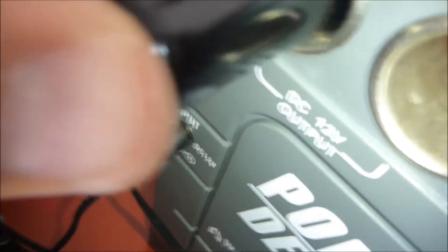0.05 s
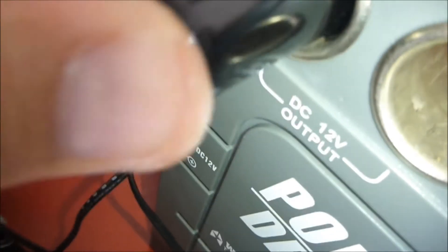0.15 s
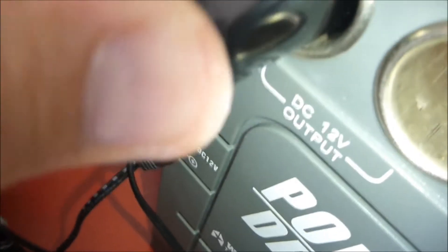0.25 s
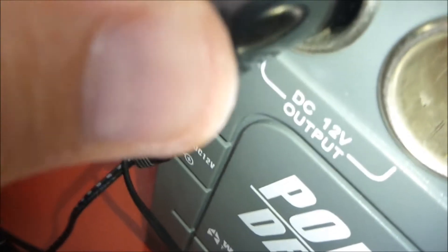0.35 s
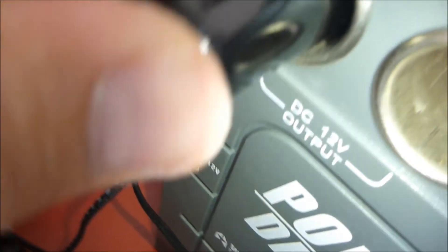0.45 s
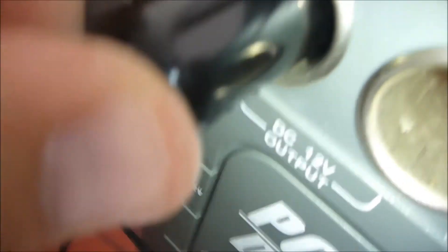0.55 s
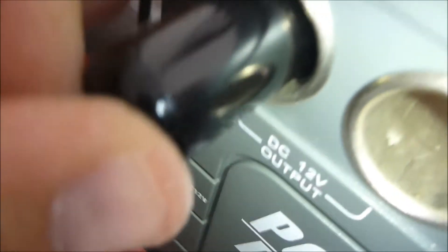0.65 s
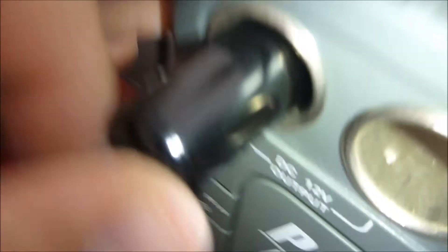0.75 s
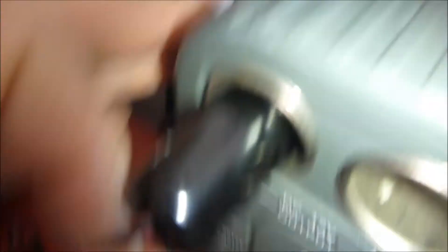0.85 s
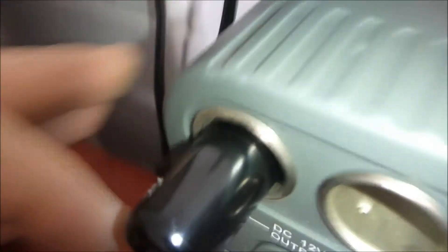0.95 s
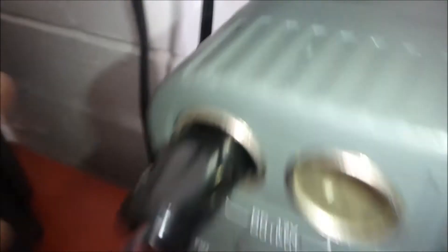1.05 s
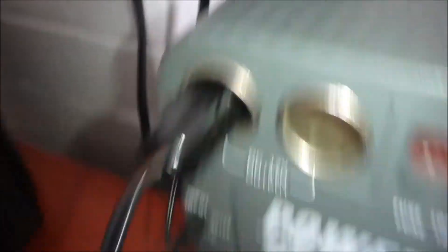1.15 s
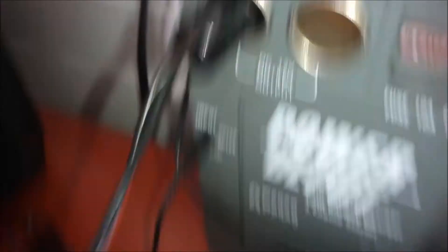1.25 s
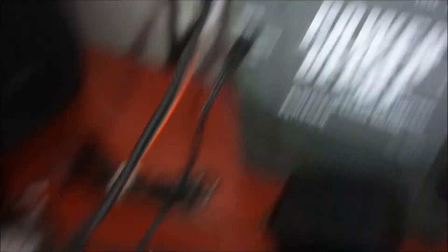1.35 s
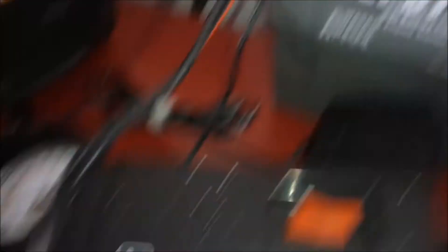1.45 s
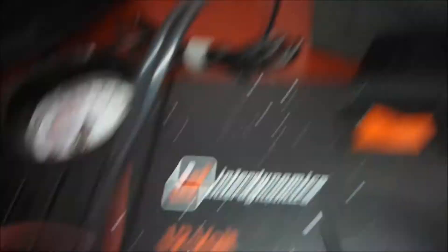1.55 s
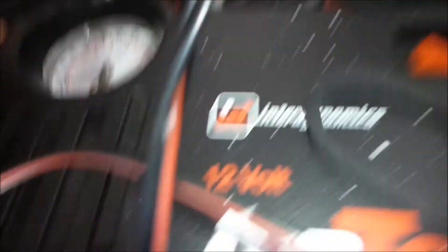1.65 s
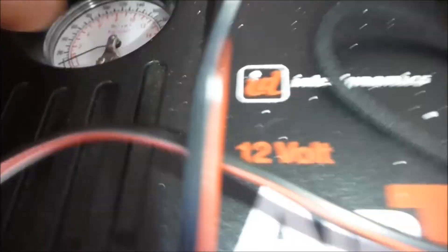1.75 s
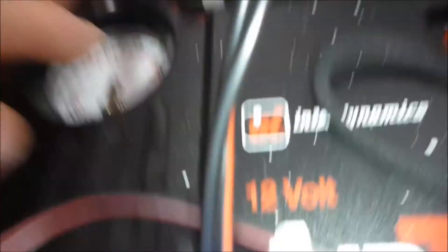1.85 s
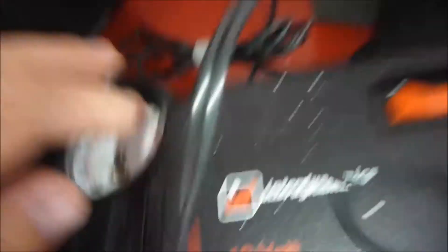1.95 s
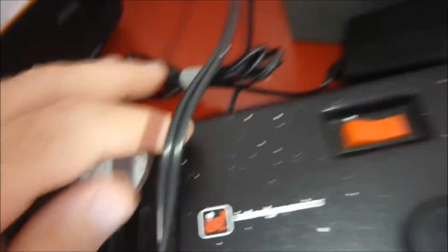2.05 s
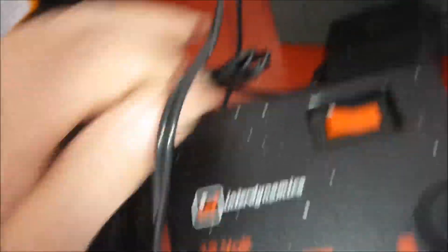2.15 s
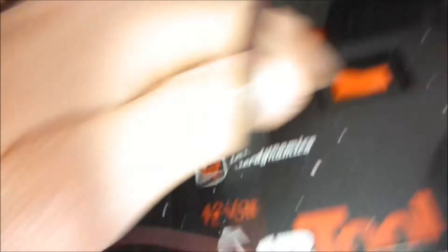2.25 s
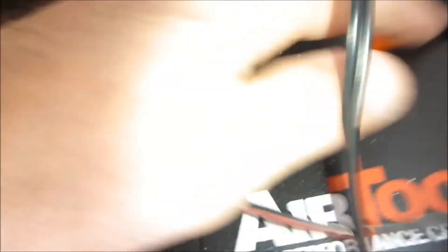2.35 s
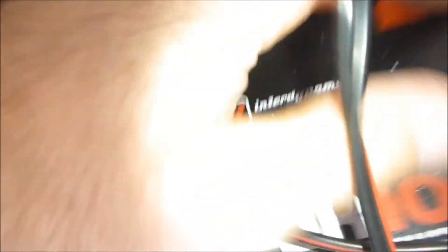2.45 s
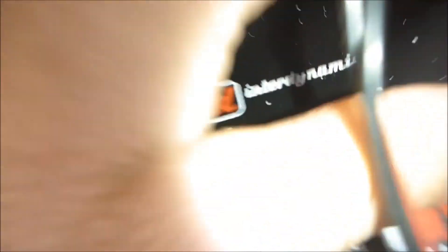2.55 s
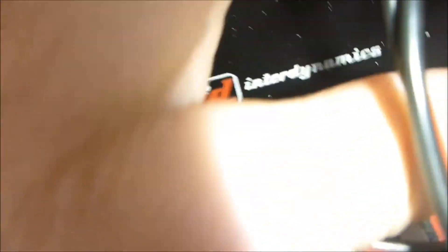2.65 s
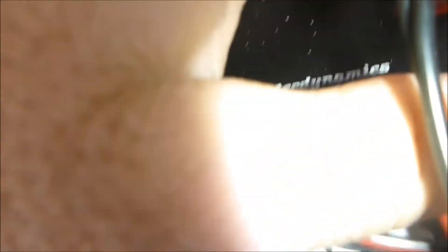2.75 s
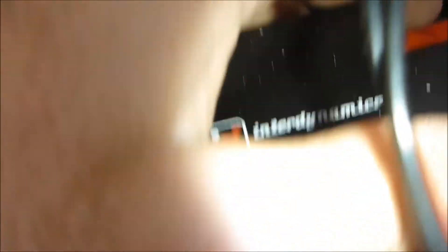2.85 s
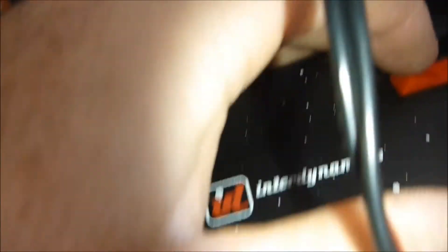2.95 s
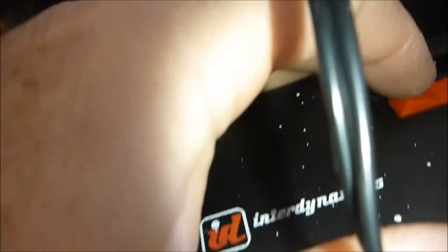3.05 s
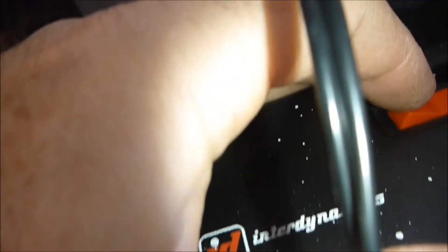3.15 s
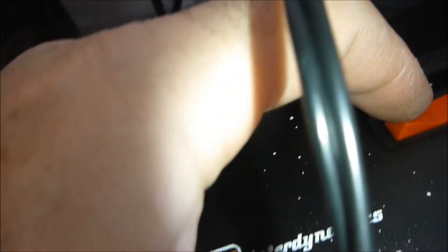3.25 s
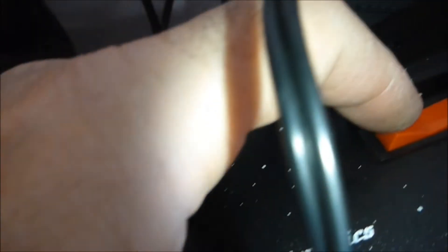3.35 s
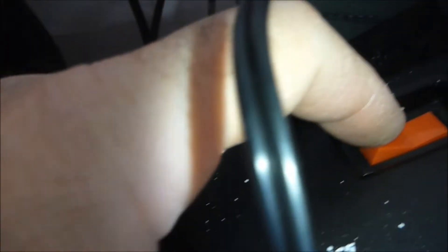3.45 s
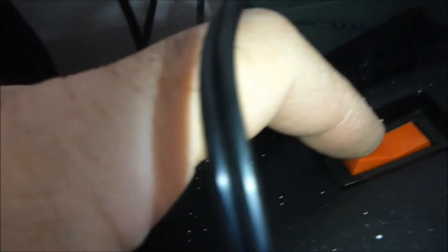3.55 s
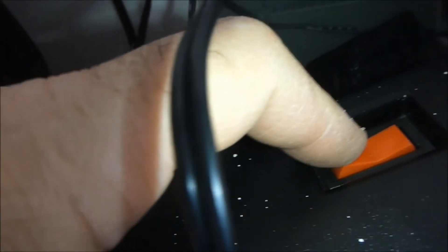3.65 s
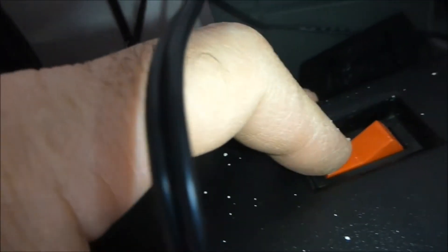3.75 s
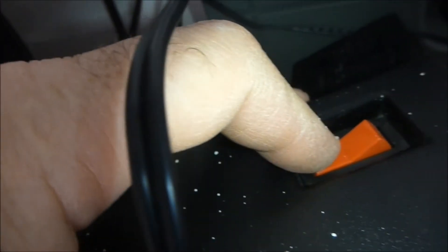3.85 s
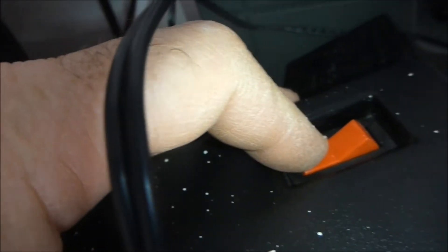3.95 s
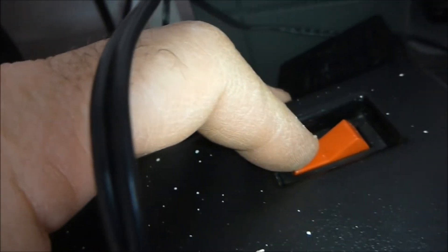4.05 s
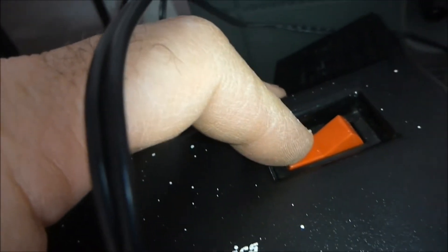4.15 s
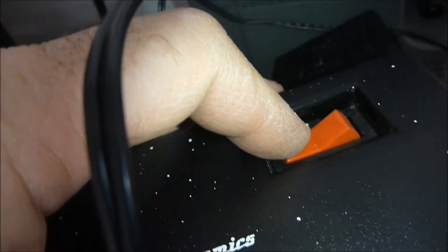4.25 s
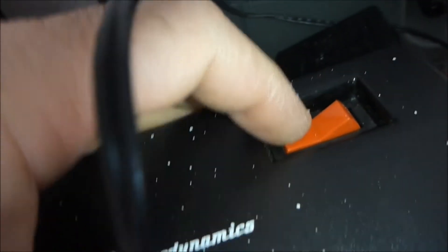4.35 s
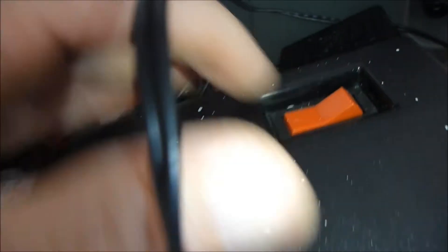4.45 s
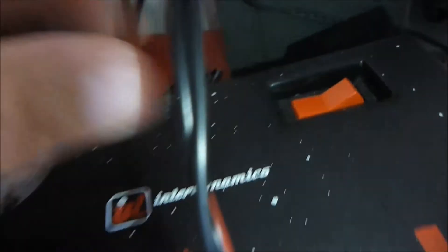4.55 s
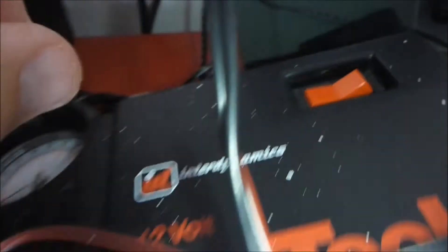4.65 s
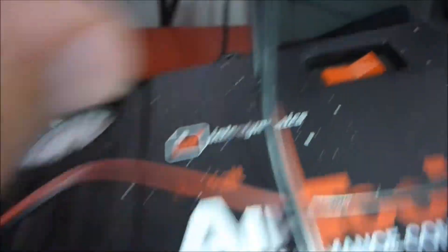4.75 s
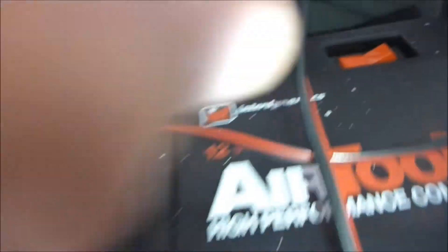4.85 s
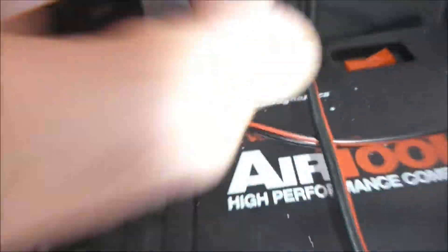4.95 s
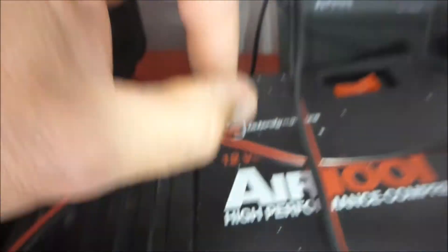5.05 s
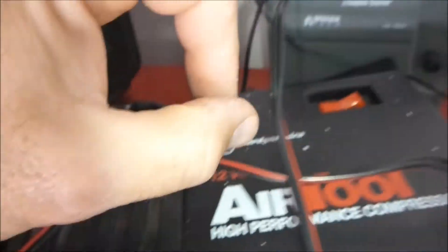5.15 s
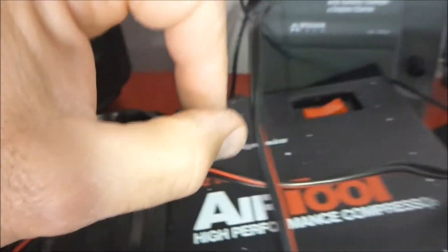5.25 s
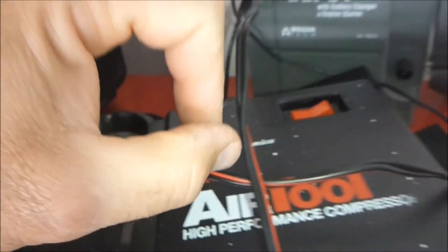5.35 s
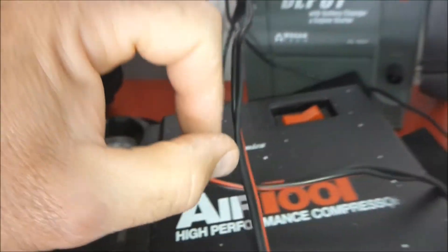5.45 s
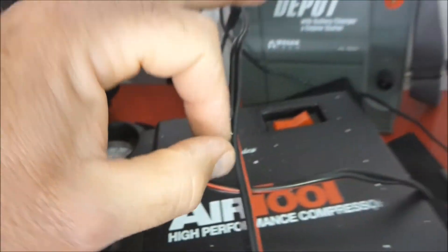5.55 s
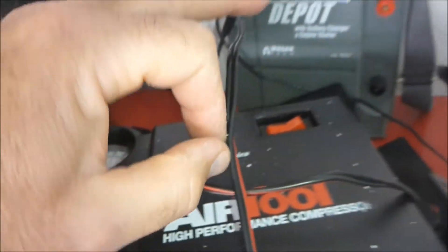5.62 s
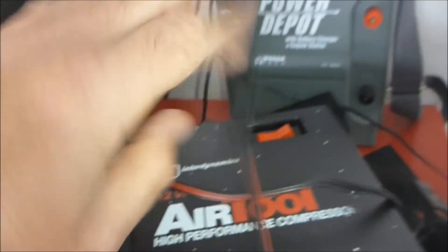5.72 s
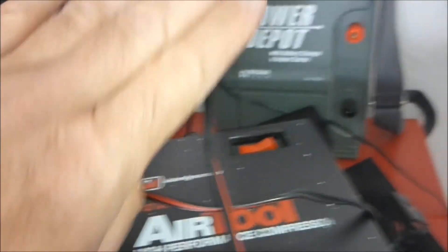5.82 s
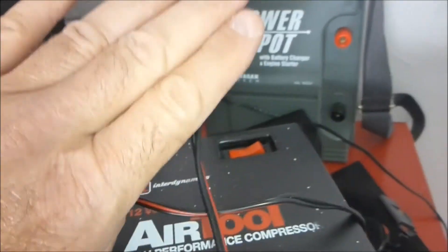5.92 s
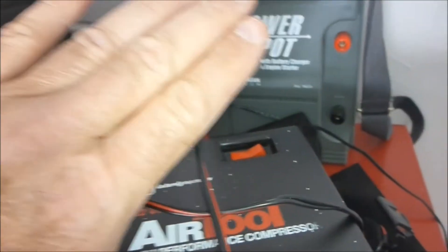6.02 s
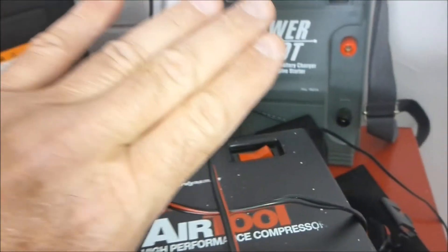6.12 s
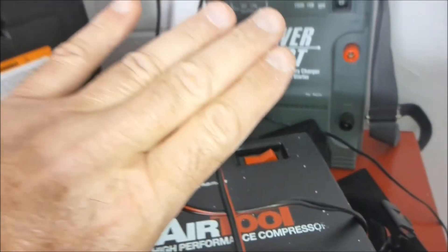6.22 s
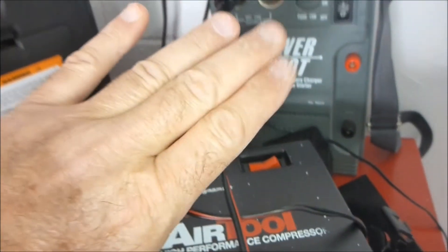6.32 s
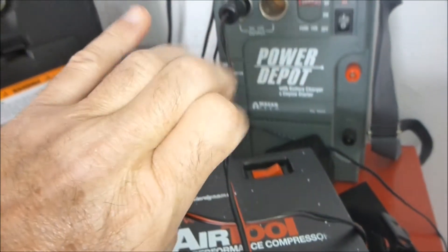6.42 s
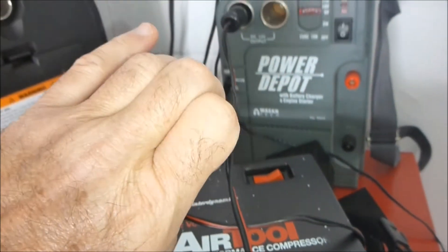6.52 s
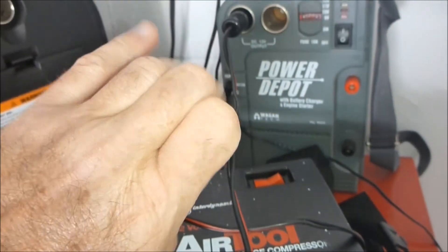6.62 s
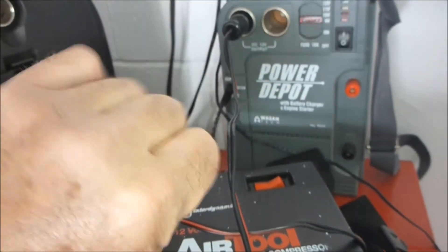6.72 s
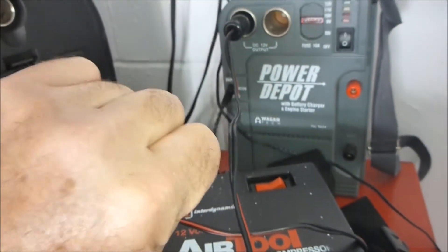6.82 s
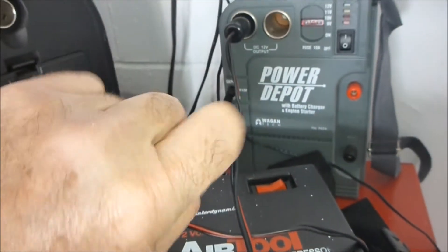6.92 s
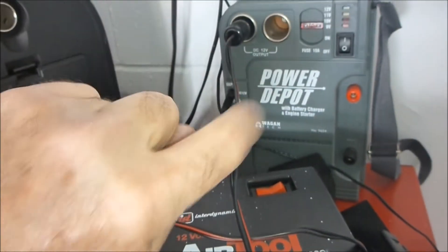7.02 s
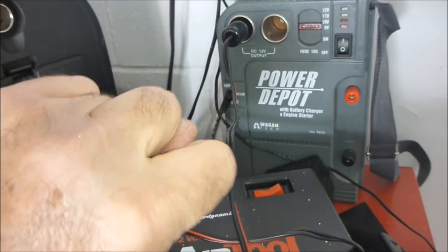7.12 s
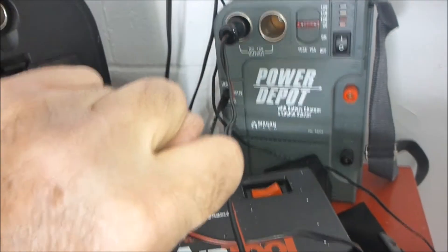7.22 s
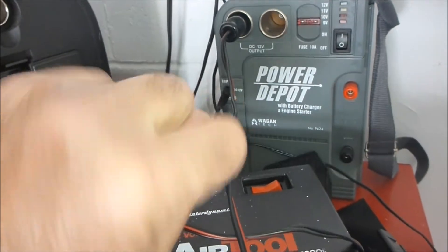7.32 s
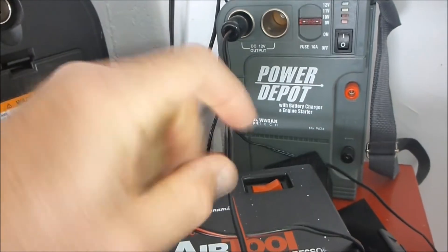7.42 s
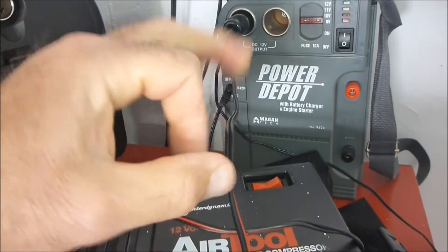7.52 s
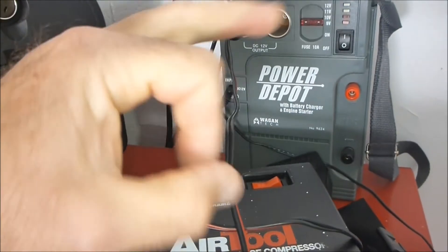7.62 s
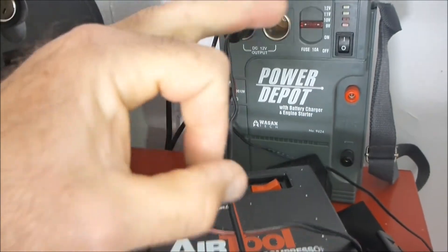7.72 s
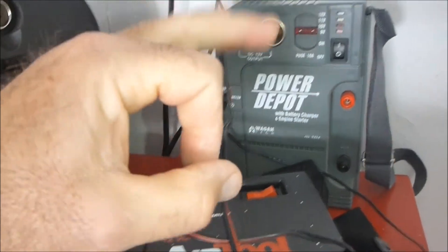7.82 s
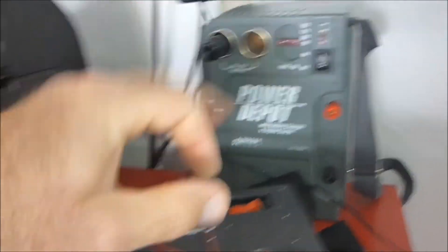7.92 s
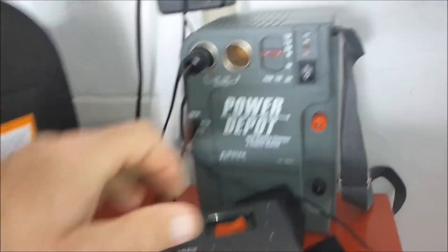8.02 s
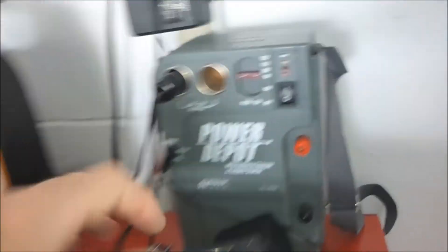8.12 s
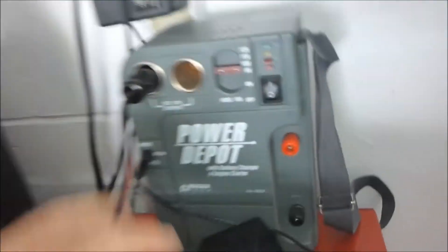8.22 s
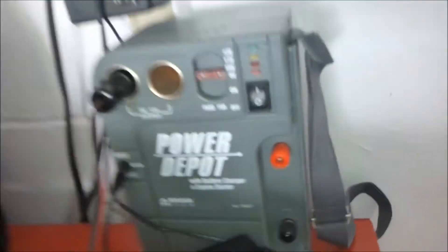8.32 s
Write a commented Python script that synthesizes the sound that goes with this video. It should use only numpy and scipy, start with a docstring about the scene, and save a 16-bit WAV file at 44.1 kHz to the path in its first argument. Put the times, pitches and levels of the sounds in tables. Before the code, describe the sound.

The scene is outdoors, with the microphone close and a dull, steady noise in the distance. In the first 0.2 seconds a plug scrapes and clicks into a battery pack, followed by light ticks and a faint squeak. A far-off bird chirps softly from about 0.3 to 3.5 seconds. Around 2.2 seconds a hand bumps a hollow plastic case in a quick cluster of knocks, with rubbing and small clicks until about 3 seconds. At 3.7 seconds a rocker switch snaps with a loud double click and a small air compressor starts, labouring up to speed within a second. Its piston chatters rapidly over rattling gears, a motor hum and hissing puffs of air. The whine and wheeze swell around 5 seconds, then the machine runs steadily, still going when the sound ends at about 8.4 seconds.

```python
"""Outdoors, a plug is pushed into a battery pack and a hand knocks about on a small plastic air compressor.
A rocker switch snaps; the motor labours up to speed and drives a piston through a reduction gear.
Every stroke sets the reed valve ringing and blows a puff of air, while the impacts of the gear teeth
force the case into vibration. A bird sings far off, over dull and steady noise."""
import sys
import numpy as np
from scipy import signal
from scipy.fft import rfft, irfft
from scipy.io import wavfile

SR = 44100
rng = np.random.default_rng(int(sys.argv[2]) if len(sys.argv) > 2 else 0)


def output_pcm(signal):
    """Save a mono or channel-first signal as 16-bit PCM at the path in sys.argv[1].

    Samples are clipped to [-1, 1] before scaling.
    """
    pcm = np.clip(np.atleast_2d(signal).T, -1, 1) * 32767
    wavfile.write(sys.argv[1], SR, np.round(pcm).astype(np.int16))


N = 369558
TIME = np.arange(N) / SR
MOTOR_TEETH, CRANK_TEETH = 12, 55
ON_S = 3.694  # the switch closes
SURGE_DB = 3.5  # a brief swell of wheeze and whine, from about 4.35 to 5.5 s
# response of the case to the gears: f/Hz, relative level/dB
CASE_RESPONSE = [(25, -49), (60, -36), (130, -38), (415, -31), (500, 5.5), (620, 3.5), (740, -3.5),
                 (1100, 8), (1350, -4.5), (1700, -4), (2000, -8.5), (2600, -9), (3500, -7.5), (4500, -14.5),
                 (16000, -34)]


def crank(run_up_s=.2855, stick_turns=.17):
    """First-order run-up: speed in turns/s, and turns made. The crank sticks, then catches up."""
    # the speed that the crank heads for, sagging a little: t/s, speed/(turns/s)
    top_speed = [(5, 34.298), (6.2, 34.241), (7.2, 34.027), (7.7, 34.067), (8.38, 33.75)]
    speed = follow(top_speed)[0] * settle(0, 1, run_up_s)
    turns = np.cumsum(speed) / SR
    return speed, turns - stick_turns * np.tanh(turns / stick_turns) * np.exp(-turns ** 2)


def valve(turns, sag_hz=25.3, scatter_rad=.98, uneven_db=-.96, upper_ratio=2.09, upper_db=-9):
    """Free vibration of a reed: each stroke throws it open; it rebounds under pressure and slaps shut."""
    # how hard the reed is thrown open: t/s, relative level/dB
    throw = [(3.78, -7), (4.05, -3.5), (4.3, -3), (4.65, -7.5), (6.3, -10), (8.08, -18), (8.36, -4)]
    hz = settle(1193, 964.4, .237) - sag_hz * surge()
    stroke = turns.astype(int)
    slip, size, rebound_db = rng.standard_normal((stroke[-1] + 1, 3))[stroke].T
    cycles = np.cumsum(hz) / SR
    stroke_cycles = cycles - cycles[np.searchsorted(turns, stroke)]
    angle = 2 * np.pi * stroke_cycles + scatter_rad * slip + .21 * wander(250)
    opening = 1.45 * amp(follow(throw)[0]) * kick(turns, .29, .067, .12)
    rebound = amp(settle(-21, -12.5, .5) + rebound_db) * lobe(turns, .6, .11)
    slap = amp(settle(-9, -26, 1.93)) * lobe(turns, .87, .026) * (turns > .5)
    reed = (opening + rebound + slap) * np.sin(angle)
    reed += amp(upper_db) * opening * np.sin(upper_ratio * angle)
    hush = 1 - lobe(turns, 0, .022)  # the ring falls silent briefly as each turn begins
    return np.sqrt(2) * amp(uneven_db * size) * reed * hush * (1 + .073 * wander(180))


def gear_rattle(turns, jitter_s=.00005, wear_db=4, uneven=.53, loose=.9, mesh=.12, labour=.36):
    """Impact excitation of the case: each tooth strikes with its own force at its own place."""
    strength, offset = rng.standard_normal((2, CRANK_TEETH))
    count = np.arange(1, int(turns[-1] * CRANK_TEETH) - 2)
    tooth = count % CRANK_TEETH
    late, size, slack = rng.standard_normal((len(count), 3)).T
    place = (count + .15 * offset[tooth]) / CRANK_TEETH
    strike_s = np.interp(place, turns, TIME) + jitter_s * late
    load = .67 + .5 * lobe(place, .39, .12) + .86 * lobe(place, .99, .14)  # compression and return
    flank = rng.choice([-1, 1], CRANK_TEETH)[tooth]
    push = mesh + labour * np.exp(-place / 6)  # the starting torque presses the teeth together
    wear = flank * amp(wear_db * np.tanh(strength[tooth]))
    force = load * (push + wear * (1 + uneven * size) + loose * slack)
    blows = np.bincount((strike_s * SR).astype(int), force, N)[:N]
    rattle = colour(echoes(blows, t60=.031, wet_db=1), CASE_RESPONSE)
    rattle = shelf(rattle, treble_db=settle(-5, 4, .46))  # slow teeth strike softly
    return rattle / np.std(rattle[turns > 1]) * amp(settle(-19, -20, 2.4)) * bite()


def gear_whine(turns, rough_rad=.77, throb=.64):
    """Forced vibration of the case at harmonics of the tooth rate, swelling twice in every turn."""
    # mesh tones: harmonic, first and running relative level/dB, time constant/s
    harmonics = [(1, -24.5, -50, 0.94), (2, -28.5, -37.5, 1.1), (3, -37, -31.5, 1.6)]
    tones = np.zeros(N)
    for multiple, *level in harmonics:
        angle = 2 * np.pi * multiple * CRANK_TEETH * turns + rough_rad * wander(110)
        tones += amp(settle(*level)) * np.sin(angle)
    load = 1 + throb * np.cos(4 * np.pi * (turns - .36))
    return amp(SURGE_DB * surge()) * colour(bite() * load * tones, CASE_RESPONSE)


def intake(turns, speed, chatter=.37, rest_tuning=.62):
    """Flow noise excites the inlet's resonances: a wheeze that rises in pitch as the flow builds."""
    # indrawn air at full speed: f/Hz, relative level/dB
    spectrum = [(300, -39), (1500, -29), (2000, 8), (2650, -3.5), (3150, 16), (3500, -8.5), (3850, 12),
                (4400, -38), (5000, 9.5), (5700, 8), (6300, -19), (16000, -20)]
    flow = rng.standard_normal(N)
    flap = np.resize(rng.standard_normal(int(SR / speed.max())), N)  # chatters alike on each turn
    rasp = colour(flow + chatter * flap, spectrum) / np.hypot(1, chatter)
    tuning = rest_tuning + (1 - rest_tuning) * speed / speed.max()
    wheeze = np.interp(np.cumsum(tuning), np.arange(N), rasp)
    suction = .27 + .69 * lobe(turns, .864, .048) + .5 * lobe(turns, .34, .067)
    return amp(settle(-105, -24, .1) + SURGE_DB * surge()) * wheeze * suction * bite()


def exhaust(turns, leak=.31):
    """Turbulence of the expelled air hisses, and each puff makes the outlet's resonances squeal."""
    # expelled air: f/Hz, relative level/dB
    spectrum = [(1000, 14), (6000, 0), (6800, 2.5), (8400, 1.5), (9700, 6.5), (10900, 2.5), (12400, 9.5),
                (12800, -12), (13350, -4), (13750, -5), (14100, 9.5), (14600, 1), (15300, 2), (16000, -26)]
    # outlet resonances: f/Hz, bandwidth/Hz, relative level/dB
    resonances = [(6900, 130, 4), (7580, 72, 0), (8540, 98, 5.5), (9000, 35, 4), (9760, 130, 9.5),
                  (10140, 100, -5), (12550, 180, 9), (13350, 130, 5), (14200, 120, -7), (15200, 130, -9)]
    flow = leak + 1.09 * lobe(turns, .56, .2) + .19 * lobe(turns, .57, .22)
    hiss = colour(rng.standard_normal(N) * flow, spectrum)
    puff = .81 * kick(turns, .23, .1, .13) * rng.standard_normal(N)
    squeal = sum(amp(db) * resonate(puff, hz, width) for hz, width, db in resonances)
    return (amp(settle(-65, -30.5, .54)) * hiss + amp(settle(-27.5, -36.5, .56)) * squeal) * bite()


def hum(turns, speed, waver=.093, sway_rad=.073):
    """Shaft harmonics grow as speed squared; rotating unbalance shakes the case once per motor turn."""
    # tones of each shaft: multiple of its rotation rate, level at full speed/dB
    motor_orders = [(3, -38.5), (4, -40), (7, -34.5)]
    crank_orders = [(2, -86), (4, -53.5), (8, -42), (9, -44.5), (11, -48.5), (13, -45), (16, -33),
                    (36, -52.5), (38, -48), (58, -34)]
    # shake of the motor: t/s, level/dB
    unbalance = [(3.9, -58), (4.15, -38), (4.8, -38.5), (6.0, -56), (7.1, -46.5), (8.38, -41.5)]
    tones, gearing = np.zeros(N), CRANK_TEETH / MOTOR_TEETH
    for ratio, orders in ((gearing, motor_orders), (1, crank_orders)):
        for multiple, db in orders:
            angle = 2 * np.pi * (multiple * ratio * turns + rng.random()) + sway_rad * wander(7)
            tones += amp(db) * (1 + waver * wander(14)) * np.sin(angle)
    shake = amp(follow(unbalance)[0]) * np.sin(2 * np.pi * gearing * turns)
    return np.sqrt(2) * (tones * (speed / speed.max()) ** 2 + shake)


def clicks(crack_s=.00062, ring=.59, size=8000):
    """Impulse response of small plastic parts: a short crack, then the decay of densely spaced modes."""
    # plug, cable and switch: t/s, relative level/dB, tilt/(dB/octave), T60/s
    impacts = [(.005, -19, -8, 0.081), (0.037, -13.5, -3.5, 0.027), (.047, -18, 9.5, .021),
               (.091, -28, -0.5, .035), (.115, -19.5, -9, 0.065), (0.1394, -11, 3.5, 0.024),
               (.406, -31, 2.5, 0.03), (0.683, -36.5, 0.5, 0.072), (.8, -28, -1.5, 0.14),
               (2.215, -19.5, -2.5, .15), (2.239, -18, -2, .11), (2.371, -28.5, -4, .063),
               (2.602, -24.5, -1, .025), (2.623, -20.5, -2, 0.066), (2.719, -25, -2, 0.073),
               (2.761, -30.5, -3.5, 0.26), (3.004, -20.5, -1.5, 0.067), (3.039, -22.5, -1, 0.071),
               (3.597, -25.5, 0, 0.053), (3.6575, -7.5, -7.5, 0.05), (3.6931, -2, 1, 0.032)]
    # hard plastic: f/Hz, relative level/dB
    plastic = [(60, -18), (250, -1), (550, 8), (1100, 7), (2200, 9), (3300, 3.5), (5000, 0), (8000, -5.5),
               (13000, -9.5), (16000, -11)]
    out, t = np.zeros(N), np.arange(size) / SR
    for s, db, tilt_db, t60 in impacts:
        burst = rng.standard_normal(size) * (np.exp(-t / crack_s) + ring * amp(-60 * t / t60))
        add(out, s, amp(db) * colour(burst, plastic, tilt_db))
    return out


def knocks(soft_s=.0016):
    """Modal ringing: soft blows excite the hollow case, and the plug snaps home once."""
    # blows of the hand: t/s, relative level/dB
    blows = [(2.203, -21), (2.222, -14), (2.2295, -11.5), (2.2338, -8), (2.253, -11.5), (2.284, -17),
             (2.300, -16.5), (2.309, -14), (2.33, -24), (2.487, -27.5)]
    # modes of the hollow case: f/Hz, relative level/dB, T60/s
    shell_modes = [(547, -29, 0.034), (717, 8.5, 0.042), (785, -6.5, 0.12), (950, -14, 0.11),
                   (1237, -9, 0.074), (1736, -14.5, 0.094), (2380, -19, 0.07), (3390, -17.5, 0.065)]
    # modes of the battery case and its spring contact: f/Hz, level/dB, T60/s
    latch_modes = [(259, -21, 0.12), (527, -22, 0.045), (9040, -14, 0.015), (13200, -14, 0.016),
                   (14100, -17, .016)]
    out, ring = np.zeros(N), ringing(shell_modes)
    for s, db in blows:
        add(out, s, amp(db) * ring * (1 - np.exp(-TIME[:len(ring)] / soft_s)))
    add(out, .1402, ringing(latch_modes))
    return out


def rubbing(slips_per_s=2500, spread_db=3):
    """Stick-slip friction of skin and cable on plastic; each slide swells quickly and fades slowly."""
    # slides: t/s, duration/s, level/dB
    slides = [(0.017, 0.086, -25.5), (0.083, 0.11, -27.5), (0.148, .17, -41.5), (.47, .14, -43.5),
              (0.71, 0.4, -42.5), (1.33, 0.63, -36), (1.75, 0.95, -45), (2.175, 0.33, -29),
              (2.424, 0.44, -39), (2.672, 2.1, -45.5), (3.7, 0.42, -30)]
    # rubbed plastic: f/Hz, relative level/dB
    spectrum = [(80, -3), (250, 1), (700, 10), (1500, 2), (3000, -6), (6000, -17), (13000, -24.5),
                (16000, -29)]
    slips = (rng.random(N) < slips_per_s / SR) * rng.choice([-1, 1], N)
    strength = amp(spread_db * np.minimum(rng.exponential(1, N), 4))
    level = sum(amp(db) * swell(s, length, skew=.52) ** 2 for s, length, db in slides)
    return level * evened(colour(slips * strength, spectrum))


def squeak(hz=2170, width_hz=130):
    """Friction in the socket drives a resonance of the plug's spring contact."""
    return amp(-48.5) * swell(.51, .62) * resonate(rng.standard_normal(N), hz, width_hz)


def bird(note_s=.0377, arch_hz=60, quaver_hz=700, song_db=9.5):
    """Frequency-modulated whistles: short arched glides, blurred by reverberation over distance."""
    # notes: t/s, mid-note f/Hz, glide/Hz, relative level/dB
    notes = [(.332, 3300, -200, -53), (.475, 4120, -300, -60), (.545, 4530, 500, -60),
             (.93, 4570, 100, -54), (.958, 4360, 700, -54), (1.078, 3600, -480, -54),
             (1.114, 3820, -750, -52), (1.161, 3850, 238, -58), (1.26, 3880, 600, -52.5),
             (1.362, 3650, -400, -54), (1.51, 4200, 600, -57), (1.615, 4550, -400, -49),
             (1.642, 4000, -500, -52), (1.688, 3850, -500, -51), (1.739, 3770, -700, -55),
             (1.875, 3780, -400, -59), (1.917, 3650, -550, -55), (2.042, 3290, 8, -54),
             (2.165, 3340, -350, -50), (2.39, 3770, -500, -55), (2.738, 4080, 200, -51),
             (2.865, 3400, -500, -53), (3.175, 4850, -350, -57), (3.237, 3720, -800, -56),
             (3.355, 3390, 380, -52), (3.515, 3730, -600, -54)]
    song, u = np.zeros(N), np.linspace(0, 1, int(note_s * SR))
    arch = np.sin(np.pi * u)
    for s, pitch_hz, glide_hz, db in notes:
        hz = pitch_hz + glide_hz * (u - .5) + arch_hz * (arch - 1)
        hz += quaver_hz * rng.standard_normal(len(u))
        add(song, s, amp(db) * arch * np.sin(2 * np.pi * np.cumsum(hz) / SR))
    return amp(song_db) * echoes(song, t60=.5, wet_db=-4)


def ambience(level_db=-40.5):
    """Stationary random noise: the dull sound of the distance outdoors."""
    # background: f/Hz, relative level/dB
    spectrum = [(15, -29), (25, -57), (66, -3), (153, 0), (463, -3.5), (560, -2), (1230, -12.5),
                (2480, -18.5), (2910, -23), (3430, -19), (10100, -32.5), (11600, -36), (13600, -32),
                (16000, -39)]
    return amp(level_db) * evened(colour(rng.standard_normal(N), spectrum))


def since_on():
    """Seconds since the switch closed."""
    return np.maximum(TIME - ON_S, 0)


def settle(first, running, settle_s):
    """Exponential relaxation from a first to a running value after switch-on."""
    return running + (first - running) * np.exp(-since_on() / settle_s)


def bite(rise_s=.075):
    """Onset transient, 0 to 1, as the drive takes up its load."""
    return 1 - np.exp(-(since_on() / rise_s) ** 3)


def surge():
    """One slow swell near full speed, 0 to 1."""
    return swell(4.35, 1.18)


def swell(start_s, length_s, skew=1):
    """Half-sine envelope; a skew under 1 brings the peak forward."""
    return np.sin(np.pi * np.clip((TIME - start_s) / length_s, 0, 1) ** skew)


def lobe(turns, place, width):
    """A Gaussian pulse once in every turn of the crank."""
    return np.exp(-.5 * (((turns - place + .5) % 1 - .5) / width) ** 2)


def kick(turns, place, rise, fall):
    """A quick rise and an exponential decay, once in every turn."""
    u = np.maximum(turns % 1 - place, 0)
    return (1 - np.exp(-(u / rise) ** 2)) * np.exp(-u / fall)


def wander(band_hz):
    """Band-limited random fluctuation of rms 1."""
    slow = np.fft.rfftfreq(N, 1 / SR) < band_hz
    return evened(irfft(rfft(rng.standard_normal(N)) * slow, N))


def ringing(modes, size=9000):
    """Superposition of freely decaying modes."""
    t = np.arange(size) / SR
    return sum(amp(db - 60 * t / t60) * np.sin(2 * np.pi * hz * t) for hz, db, t60 in modes)


def resonate(x, hz, width_hz):
    """A two-pole resonator of unit energy."""
    r = np.exp(-np.pi * width_hz / SR)
    feedback = [1, -2 * r * np.cos(2 * np.pi * hz / SR), r * r]
    return signal.lfilter([1, 0, -1], feedback, x) * np.sqrt((1 - r * r) / 2)


def colour(x, points, tilt_db=0, size=4096):
    """Minimum-phase filter of unit energy with the given spectrum, tilted per octave."""
    hz, db = np.transpose(points)
    octave = np.log2(abs(np.fft.fftfreq(size, 1 / SR)) + 1)
    gain_db = np.interp(octave, np.log2(hz), db) + tilt_db * np.maximum(octave, np.log2(hz[1]))
    spectrum = np.exp(np.conj(signal.hilbert(np.log(amp(gain_db)))))
    response = np.fft.ifft(spectrum).real[:size // 2]
    return signal.oaconvolve(x, response / np.linalg.norm(response))[:len(x)]


def shelf(x, treble_db, corner_hz=1300):
    """Shelving filter: cuts or lifts what lies above the corner."""
    low = signal.sosfiltfilt(signal.butter(2, corner_hz, fs=SR, output="sos"), x)
    return low + amp(treble_db) * (x - low)


def thin(x, corner_hz=330):
    """Parts much smaller than the wavelength radiate little bass."""
    return signal.sosfilt(signal.butter(2, corner_hz, "high", fs=SR, output="sos"), x)


def echoes(x, t60, wet_db, size=12000):
    """Reverberation: adds a decaying tail of sparse reflections."""
    taps = rng.standard_normal(size) * (rng.random(size) < .1) * amp(-60 * np.arange(size) / SR / t60)
    return x + amp(wet_db) * signal.oaconvolve(x, taps / np.linalg.norm(taps))[:N]


def amp(db):
    return 10 ** (np.asarray(db) / 20)


def evened(x):
    return x / np.sqrt(np.mean(x ** 2) + 1e-20)


def follow(rows):
    """The columns of a curve at every sample."""
    s, *columns = np.transpose(rows)
    return [np.interp(TIME, s, c) for c in columns]


def add(mix, s, sound):
    part = mix[max(round(s * SR), 0):][:len(sound)]
    part += sound[:len(part)]


def scene(away_s=6.54, away_db_per_s=.5):
    """Superposition of the machine, the handling before it, the bird and the distant noise."""
    speed, turns = crank()
    away = amp(-away_db_per_s * np.maximum(TIME - away_s, 0))  # the microphone backs away from the case
    gears = echoes(gear_rattle(turns) + gear_whine(turns), t60=.12, wet_db=-7)
    case = away * (gears + hum(turns, speed))
    reed = echoes(valve(turns), t60=.11, wet_db=-12)
    air = echoes(intake(turns, speed) + exhaust(turns), t60=.11, wet_db=-9.5)
    handling = echoes(clicks() + knocks() + rubbing() + squeak(), t60=.11, wet_db=-11)
    return (case + thin(reed + air) + handling + bird() + ambience())[None]


def record(dry, edge_hz=16100):
    """Microphone response: narrow notches, clipping at full scale and a band limit."""
    # dead bands of the microphone: f/Hz, width/Hz
    notches = [(2895, 110), (7400, 110), (11750, 610)]
    hz = np.fft.rfftfreq(N, 1 / SR)
    dips = [1 - .86 * np.exp(-(2 * (hz - centre) / width) ** 2) for centre, width in notches]
    heard = np.clip(irfft(rfft(dry) * np.prod(dips, axis=0), N), -1, 1)
    band_limit = signal.firwin(511, edge_hz, window=("kaiser", 9), fs=SR)
    return signal.oaconvolve(heard, band_limit[None], "same")


dry = scene()
out = record(dry)
output_pcm(out)
```